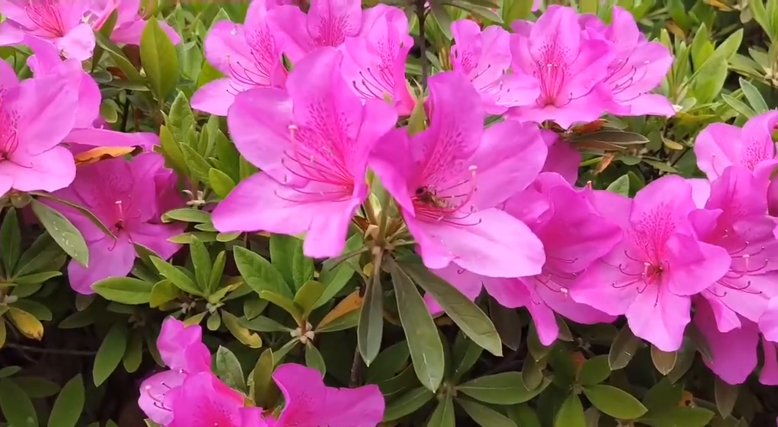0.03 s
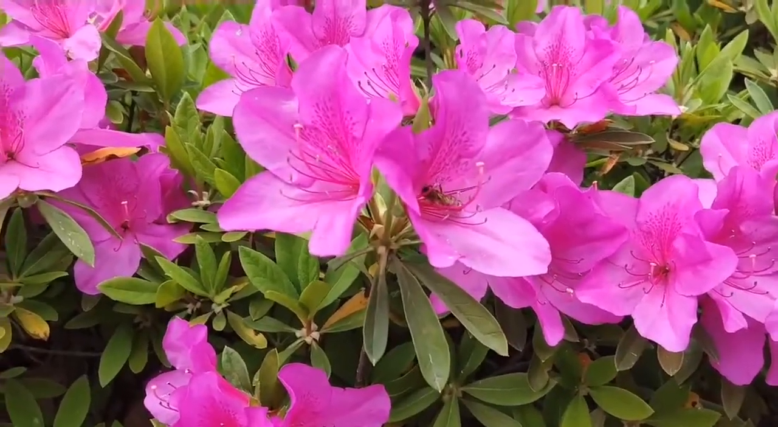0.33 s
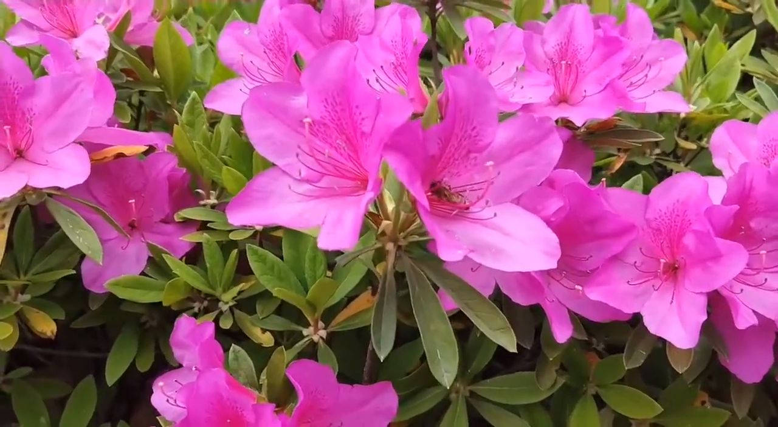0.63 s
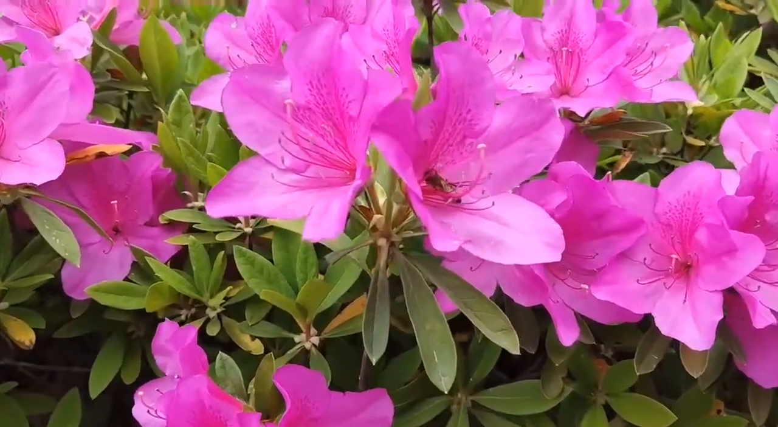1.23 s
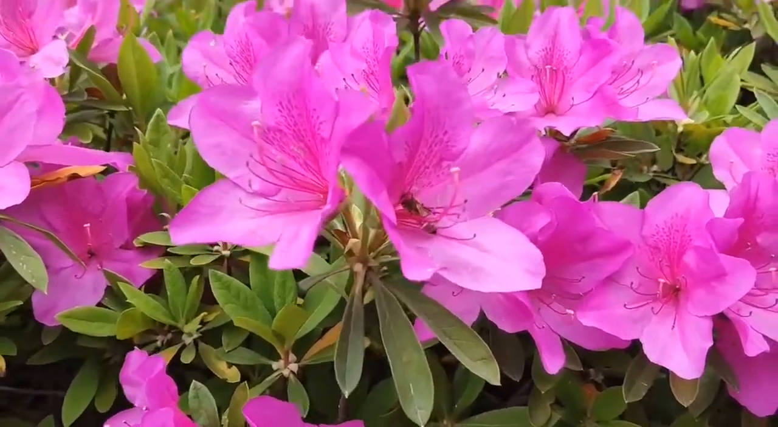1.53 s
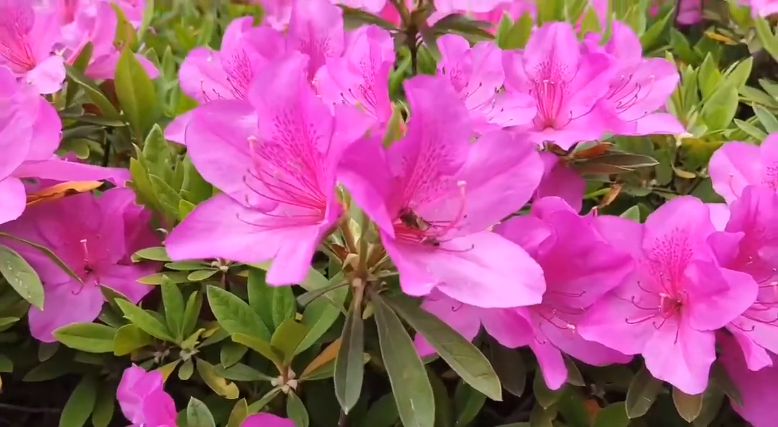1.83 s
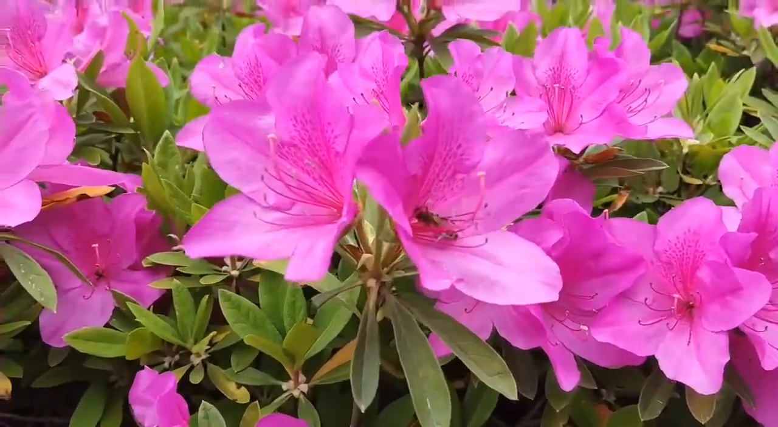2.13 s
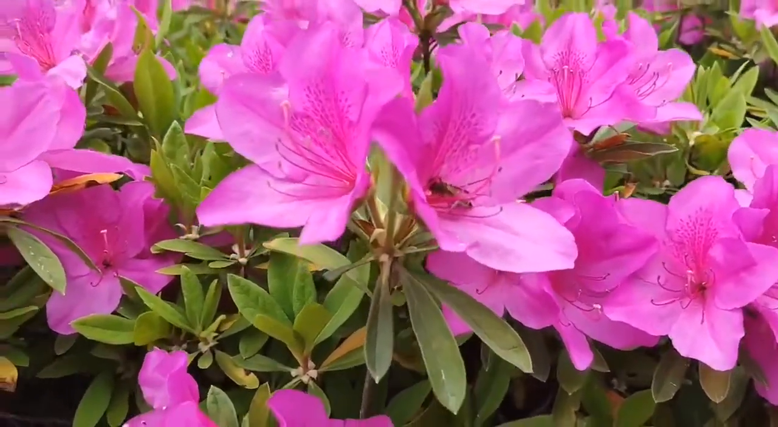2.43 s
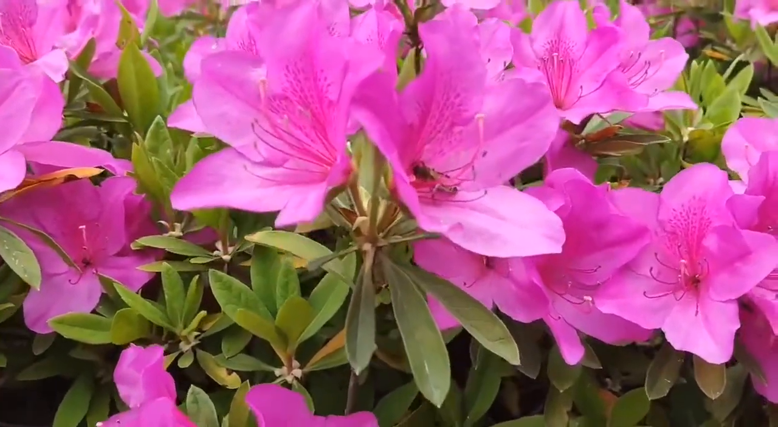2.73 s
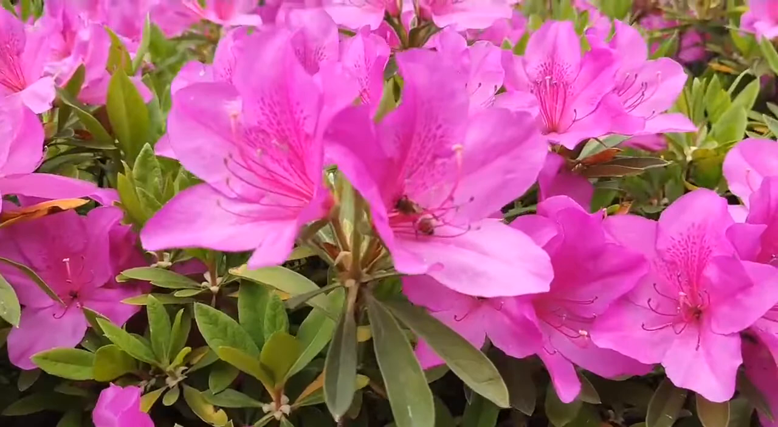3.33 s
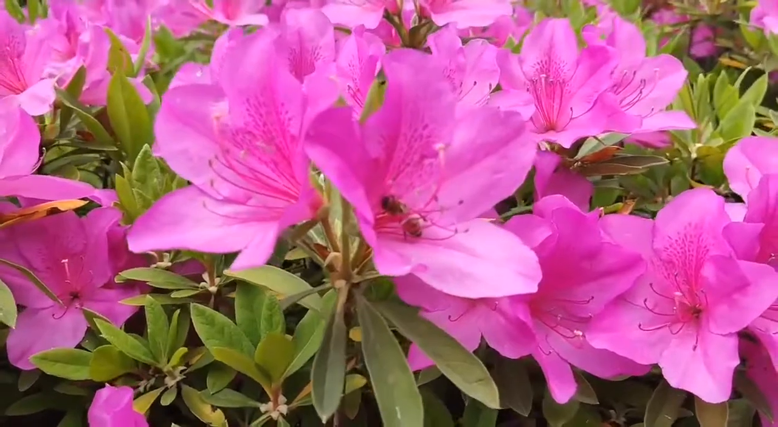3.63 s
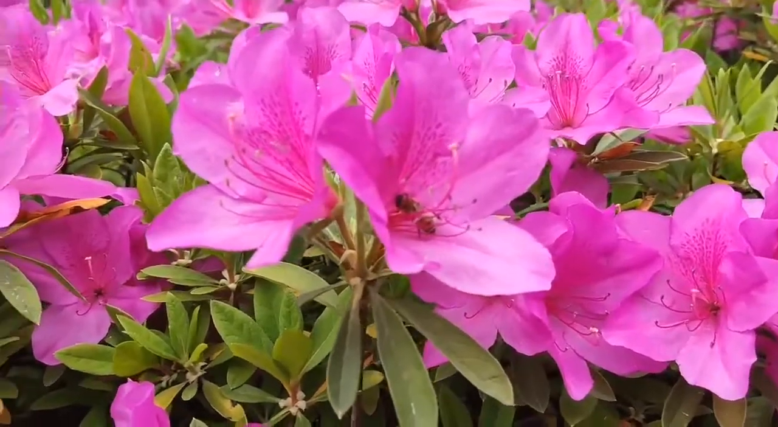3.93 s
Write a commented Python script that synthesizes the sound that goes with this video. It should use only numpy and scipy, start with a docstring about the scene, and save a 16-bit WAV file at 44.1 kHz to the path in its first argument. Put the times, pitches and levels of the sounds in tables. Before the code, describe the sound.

Birds call in a garden: soft chatter, two sharp chips, short whistles and rasps, then two more chips. A few twigs tick near the microphone, over a steady distant rumble and faint hissing leaves.

```python
"""Birds call in a garden over hissing leaves and the hum and rumble of distant machinery or traffic.
A soft, even chatter runs through the first second, and twigs tick close by as it ends.
Two sharp chips follow, with a thin twitter behind them. From 1.75 s another bird gives slurred whistles,
then short rasps, and two more chips close the scene. Faint peeps dot the first 2.5 s.
Each bird's tone is the vibration of its syrinx; walls and trees scatter the calls back."""
import sys
import numpy as np
from scipy import signal
from scipy.fft import rfft, irfft
from scipy.io import wavfile
from scipy.ndimage import map_coordinates

SR = 44100
rng = np.random.default_rng(int(sys.argv[2]) if len(sys.argv) > 2 else 0)


def generate_wav(sig):
    """Save sig (samples, or channels by samples) to the path in sys.argv[1] as 16-bit PCM at SR."""
    pcm = np.round(np.clip(np.atleast_2d(sig).T, -1, 1) * 32767).astype(np.int16)
    wavfile.write(sys.argv[1], SR, pcm)


N = 176400
T = np.arange(N) / SR

# A pan is the level of the left ear over the right.
# Likeness of the noise at the two ears. Each row: frequency in Hz, correlation.
EAR_CORRELATION = [(30, 0.91), (80, 1), (160, 0.94), (330, 0.83), (700, 0.36), (1300, 0), (3000, 0.041),
                   (16000, 0)]
# Spectrum of the rumble. Each row: frequency in Hz, relative density in dB.
RUMBLE_SPECTRUM = [(5, -8), (20, -14.5), (30, -0.5), (45, -7.5), (56, -0.5), (66, 1.5), (76, -8),
                   (90, -8.5), (110, -12.5), (135, -16.5), (160, -18.5), (220, -21), (310, -29), (420, -30),
                   (550, -31), (900, -35), (1600, -38), (3000, -43.5), (8000, -63), (16000, -54)]
# Swell of the rumble's bass. Each row: time in seconds, gain in dB.
BASS_SWELL = [(0, -2.5), (.2, -7), (.35, -0.5), (.62, -1), (.82, 5.5), (.95, -3.5), (1.42, -1), (1.69, 3),
              (1.8, -4), (2.38, -2.5), (2.58, 3.5), (2.75, 1), (3.1, 1.5), (3.38, -2.5), (4, 0)]
# Faint drones in the rumble. Each row: pitch in Hz, bandwidth in Hz, level before the swell in dB.
DRONE_BANDS = [(70.1, 13.4, -49.5), (133.1, 3.9, -59.5), (407.5, 25, -70.5)]
# Spectrum of the leaf hiss. Each row: frequency in Hz, relative density in dB.
LEAF_SPECTRUM = [(150, 2.5), (400, 9), (700, -2), (1100, 3), (1700, -2.5), (2400, 4), (3400, -0.5),
                 (4300, -1), (5400, -4), (6700, -2), (7800, -10), (10000, -13), (12500, -13.5),
                 (14500, -8.5), (16000, -3)]
# Course of the leaf hiss. Each row: time in seconds, level in dB.
LEAF_LEVEL = [(0, -61.5), (.2, -59), (.5, -55), (.75, -53.5), (1.0, -54.5), (1.3, -50.5), (1.5, -52),
              (1.75, -53), (1.84, -52), (1.89, -50), (2.0, -52.5), (2.07, -55.5), (2.4, -54.5), (2.7, -57),
              (3.3, -62), (3.6, -57.5), (3.85, -58.5), (4, -55)]
# Direction of the leaf hiss. Each row: frequency in Hz, pan in dB.
LEAF_PAN = [(300, -0.5), (800, 1), (2000, 4.5), (5000, 4), (9000, 7.5), (13000, 0.5), (16000, 9)]
# Crackles of dry leaves. Each row: centre in seconds, width in seconds, level in dB.
LEAF_CRACKLES = [(.325, 0.042, -63.5), (.475, 0.013, -67)]
# Twig ticks. Each row: start in seconds, level in dB, pitch in Hz, decay time in seconds.
TWIG_TICKS = [(.677, -41, 1390, .001), (0.8007, -33.5, 1690, 0.00037), (1.0984, -24.5, 1050, 0.00025),
              (1.1194, -27.5, 1730, 0.00036), (1.130, -42, 1500, .0006), (1.186, -27, 1980, 0.00062),
              (1.3467, -37.5, 2520, 0.00088), (1.8, -37, 7480, 0.000091), (2.904, -44, 7000, .00015),
              (3.18, -43, 4000, 0.0004), (3.423, -44, 7000, 0.00012), (3.958, -42, 10000, 0.000096)]
# Course of the far twitter. Each row: time in seconds, level in dB.
TWITTER_LEVEL = [(1.1, -82), (1.25, -63), (1.36, -64), (1.52, -62.5), (1.66, -70.5), (1.9, -63), (2.1, -80)]
# Buzzy peeps. Each row: start in seconds, length in seconds, level in dB, pitch in Hz, pan in dB.
PEEP_NOTES = [(.022, 0.086, -63.5, 4030, 1), (.033, 0.035, -55.5, 3185, -6), (.285, .08, -61.5, 2330, 2),
              (.725, 0.055, -60, 3660, 5), (1.292, 0.034, -48.5, 3600, 4), (1.402, 0.017, -45, 3480, 5),
              (1.612, .025, -55.5, 3300, -5), (1.785, 0.026, -55.5, 3400, 3), (1.87, 0.017, -55, 2190, 7),
              (2.448, 0.025, -59.5, 4620, -3)]
# Chatter. Each row: centre in seconds, relative scratch level in dB, scratch pitch in Hz,
# relative chirp level in dB.
CHATTER_PULSES = [(0.325, -49, 2600, -65), (0.444, -46.5, 3000, -52), (0.568, -50.5, 3250, -41),
                  (.692, -50, 3150, -56), (.812, -47, 3150, -44), (.932, -47, 3200, -60),
                  (1.054, -48, 3200, -48), (1.177, -44.5, 3350, -46)]
# Airy hiss of the chatter. Each row: frequency in Hz, relative density in dB.
AIR_SPECTRUM = [(1500, -24), (2300, 5.5), (3500, 1.5), (4500, 0.5), (5300, -3), (6500, -2), (7600, -21),
                (15000, -32)]
# Rasps. Each row: start in seconds, length in seconds, level in dB, pitch in Hz, pan in dB.
RASP_NOTES = [(2.452, 0.028, -46.5, 2486, 2), (2.576, 0.044, -58.5, 3820, 5.5),
              (2.632, 0.032, -54.5, 3350, 5), (2.75, 0.054, -49.5, 2410, 2), (2.824, 0.013, -42, 2470, 6),
              (2.872, 0.045, -50, 2930, 2), (2.888, 0.035, -49, 2340, 2), (3.068, 0.018, -48, 2410, 6)]
# Whistles. Each row: start in seconds, length in seconds, level in dB,
# four pitches in Hz at even steps through the note, pan in dB.
WHISTLE_NOTES = [(1.753, 0.022, -48.5, 3050, 3150, 3220, 3130, -3),
                 (2.095, 0.024, -50.5, 1980, 2006, 1800, 1570, 2),
                 (2.302, 0.064, -44, 2435, 2345, 2315, 2180, 5.5),
                 (2.448, 0.043, -50.5, 2376, 2252, 1890, 1620, 3),
                 (2.797, 0.043, -43, 2660, 2920, 2867, 2640, 3.5),
                 (2.914, 0.049, -42.5, 2782, 2890, 2886, 2850, 2.5),
                 (3.019, 0.044, -42.5, 3660, 3520, 3487, 3470, -3),
                 (3.0, 0.112, -50.5, 2894, 2897, 2880, 3166, 2),
                 (3.078, 0.0286, -62, 5160, 5700, 5980, 6050, 11.5),
                 (3.509, 0.031, -49, 1550, 1730, 1860, 2320, 0),
                 (3.533, 0.066, -47, 2170, 2630, 2720, 2745, 1.5),
                 (3.754, 0.072, -42.5, 2360, 2310, 2250, 2230, 4),
                 (3.903, 0.094, -54.5, 2070, 1703, 1620, 1630, 1)]
# Course of every chip. Each row: time from the accent in seconds, pitch ratio, gain in dB.
CHIP_CONTOUR = [(-.022, 1.1, -26), (-.017, 0.97, -20.5), (-.012, 1.12, -34), (-.007, 1.33, -23),
                (-.003, 1.3, -24), (0, .87, -25), (.003, .96, -11.5), (.007, 1.04, -6), (.01, 0.96, -11.5),
                (0.015, 1.1, -15), (.02, 0.9, -22)]
# Chips, before the contour acts. Each row: accent time in seconds, level in dB, pitch in Hz, pan in dB.
CHIP_NOTES = [(1.24, -31, 3326, 8), (1.426, -28.5, 3245, 9), (3.792, -29.5, 3330, 5.5),
              (3.977, -28.5, 3350, 3.5)]

TWIG_PAN_DB = 5  # shared by ticks and crackles


def amp(db):
    """Amplitude ratio of a level in decibels."""
    return 10 ** (np.asarray(db) / 20)


def unit(x):
    """Normalisation to an rms of 1."""
    return x / np.sqrt(np.mean(x ** 2) + 1e-20)


def read(points, hz):
    """Interpolation on a logarithmic frequency axis."""
    f, value = np.transpose(points)
    return np.interp(np.log(hz + 1), np.log(f + 1), value)


def course(points):
    """Linear interpolation of a table over time."""
    return np.interp(T, *np.transpose(points))


def bell(centre_s, width_s):
    """Gaussian envelope with a peak of 1."""
    return np.exp(-.5 * ((T - centre_s) / width_s) ** 2)


def sides(db):
    """Interaural level difference, as left and right gains."""
    return amp(np.array([[db], [-db]]) / 2)


def bearing(x, right_lag_s):
    """Interaural time difference: a sound from one side reaches one ear first."""
    hz = np.fft.rfftfreq(N, 1 / SR)
    return np.array([x[0], irfft(rfft(x[1]) * np.exp(-2j * np.pi * hz * right_lag_s), N)])


def add(mix, start_s, sound):
    """Superposition of a stereo sound on the mix."""
    part = mix[:, max(round(start_s * SR), 0):][:, :sound.shape[1]]
    part += sound[:, :part.shape[1]]


def drift(rate_hz):
    """Low-passed noise: a smooth random fluctuation of rms 1."""
    hz = np.fft.rfftfreq(N, 1 / SR)
    return unit(irfft(rfft(rng.standard_normal(N)) * np.exp(-(hz / rate_hz) ** 2), N))


def noise(spectrum):
    """Diffuse coloured noise, correlated between the ears only at low frequencies."""
    hz = np.fft.rfftfreq(N, 1 / SR)
    left, independent = rfft(rng.standard_normal((2, N)))
    correlation = np.clip(read(EAR_CORRELATION, hz), -1, 1)
    right = correlation * left + np.sqrt(1 - correlation ** 2) * independent
    return unit(irfft(np.array([left, right]) * amp(read(spectrum, hz)), N))


def band(centre_hz, width_hz):
    """A steep resonance driven by stereo noise."""
    detuning = (np.fft.rfftfreq(N, 1 / SR) - centre_hz) / width_hz * 2
    return unit(irfft(rfft(rng.standard_normal((2, N))) / (1 + detuning ** 2), N))


def hum(pitch_hz=35.45, level_db=-42):
    """Distant machinery or traffic: a deep sinusoid under slow frequency and amplitude modulation."""
    hz = pitch_hz + .44 * drift(1.75)
    tone = np.sqrt(2) * np.sin(2 * np.pi * np.cumsum(hz) / SR)
    return amp(level_db) * tone * (1 + .26 * drift(3.4))


def rumble(swell_below_hz=112):
    """Distant machinery or traffic: broadband noise and narrow resonances, swelling in the bass."""
    steady = amp(-39.5) * noise(RUMBLE_SPECTRUM)
    steady += sum(amp(db) * band(hz, width)[0] for hz, width, db in DRONE_BANDS)
    bass = signal.sosfiltfilt(signal.butter(2, swell_below_hz, fs=SR, output="sos"), steady)
    return steady + (amp(course(BASS_SWELL)) - 1) * bass


def leaf_hiss(flicker_db=1):
    """Leaves hiss as amplitude-modulated noise, its treble stronger on the left."""
    pan = read(LEAF_PAN, np.fft.rfftfreq(N, 1 / SR))
    hiss = irfft(rfft(noise(LEAF_SPECTRUM)) * amp(np.array([pan, -pan]) / 2), N)
    return hiss * amp(course(LEAF_LEVEL) + flicker_db * drift(31))


def leaf_brush():
    """One soft brush of leaves: a band of noise under a fluttering Gaussian envelope."""
    envelope = amp(-52 + 2 * drift(250)) * bell(centre_s=1.1, width_s=.029)
    return envelope * band(centre_hz=930, width_hz=1700)


def leaf_crackle(clicks_per_s=1000, ring_hz=8550, decay_s=.00008):
    """Dry leaves crackle as clusters of random impulses, each exciting a damped resonance."""
    t = np.arange(0, .002, 1 / SR)
    clicks = rng.standard_normal((2, N)) * (rng.random(N) < clicks_per_s / SR)
    ring = np.exp(-t / decay_s) * np.sin(2 * np.pi * ring_hz * t)
    grains = signal.oaconvolve(clicks, ring[None], axes=1)[:, :N]
    envelope = sum(amp(db) * bell(centre, width) for centre, width, db in LEAF_CRACKLES)
    return unit(grains) * sides(TWIG_PAN_DB) * envelope


def twigs():
    """Each tick is a damped oscillation that decays within a cycle or two."""
    out, t = np.zeros((2, N)), np.arange(0, .02, 1 / SR)
    for start, db, hz, decay in TWIG_TICKS:
        ring = np.exp(-t / decay) * np.sin(2 * np.pi * hz * t)
        add(out, start, sides(TWIG_PAN_DB) * amp(db) * ring)
    return out


def echoes(x, t60, count=400, first_s=.008):
    """Reverberation: scattered reflections, different at each ear, fall by 60 dB in t60 seconds."""
    taps = np.zeros((2, 2 * SR))
    for ear in taps:
        delay = (np.arange(count) + rng.random(count)) / count * t60
        strength = rng.choice([-1., 1.], count) * amp(-60 * delay / t60)
        np.add.at(ear, ((first_s + delay) * SR).astype(int), strength)
    taps /= np.linalg.norm(taps, axis=1, keepdims=True)
    return signal.fftconvolve(x, taps, axes=1)[:, :N]


def sway(x, delay_s=.00003, rate_hz=60):
    """Doppler effect: moving foliage varies the delay of the echoes and smears their pitch."""
    return np.array([map_coordinates(ear, [(T + delay_s * drift(rate_hz)) * SR], order=3) for ear in x])


def twitter(flicker_db=2.2):
    """Scattering by the trees blurs a thin, far twitter into a flickering band of noise."""
    return band(centre_hz=5290, width_hz=580) * amp(course(TWITTER_LEVEL) + flicker_db * drift(25))


def syrinx(hz, octave_db=-23.5, octave_fade_hz=3600):
    """The syrinx vibrates almost sinusoidally; its weak second harmonic fades in high notes."""
    phase = 2 * np.pi * np.cumsum(hz) / SR
    octave = amp(octave_db) / (1 + (hz / octave_fade_hz) ** 10)
    return np.sqrt(2) * (np.sin(phase) + octave * np.sin(2 * phase))


def gate(t, length, rise_s=.014, release_s=.015):
    """Envelope of a note, with a quarter-sine attack and release."""
    attack = np.sin(np.pi / 2 * np.clip(t / rise_s, 0, 1))
    release = np.sin(np.pi / 2 * np.clip((length - t) / release_s, 0, 1))
    return attack * release


def hoarse(notes, swing, rate_hz, scatter):
    """Fast, uneven frequency modulation spreads a tone into sidebands, heard as a rasp or buzz."""
    out = np.zeros((2, N))
    shake_phase = 2 * np.pi * np.cumsum(rate_hz * (1 + .23 * drift(103))) / SR
    shake = 1 + swing * np.sin(shake_phase) + scatter * drift(1000)
    for start, length, db, hz, pan in notes:
        t = np.arange(0, length, 1 / SR)
        tone = syrinx(hz * np.interp(start + t, T, shake))
        add(out, start, sides(pan) * amp(db) * gate(t, length) * tone)
    return out


def chatter(rise_s=.02, fall_s=.011, chirp_decay_s=.0047, sag_per_s=9):
    """A pulse train, eight a second: each an arched chirp inside a noisy resonance and airy hiss."""
    out, t = np.zeros((2, N)), np.arange(-.025, .025, 1 / SR)
    air = amp(-49.5) * noise(AIR_SPECTRUM)
    shake = 1 + .03 * drift(450)
    for centre, scratch_db, hz, chirp_db in CHATTER_PULSES:
        scratch = amp(scratch_db) * band(hz, width_hz=900)
        out += bell(centre, np.where(T < centre, rise_s, fall_s)) * (scratch + air)
        arch = 1.1 * (1 - sag_per_s * abs(t))  # peaks a tenth above the resonance
        chirp = np.exp(-abs(t) / chirp_decay_s) * syrinx(hz * arch * np.interp(centre + t, T, shake))
        add(out, centre + t[0], sides(0) * amp(chirp_db) * chirp)
    return out * sides(.5) * amp(-5.5 + 1.7 * drift(160))


def whistles(swell_db=4):
    """Frequency glides: each clear note swells as it slurs along a cubic through four pitches."""
    out, waver = np.zeros((2, N)), 1 + .008 * drift(320)
    for start, length, db, *pitches, pan in WHISTLE_NOTES:
        t = np.arange(0, length, 1 / SR)
        glide = np.polyfit(np.linspace(0, 1, 4), pitches, 3)
        hz = np.polyval(glide, t / length) * np.interp(start + t, T, waver)
        envelope = amp(db + swell_db * (t / length - .5)) * gate(t, length)
        add(out, start, sides(pan) * envelope * syrinx(hz))
    return out


def chips(flick_scatter=.05, note_scatter=.03):
    """Rapid frequency sweeps: each chip flicks faintly upward, then snaps down to a short loud note."""
    out, shake = np.zeros((2, N)), drift(840)
    times, ratios, gains_db = np.transpose(CHIP_CONTOUR)
    t = np.arange(times[0], times[-1], 1 / SR)
    sweep, contour_db = np.interp(t, times, ratios), np.interp(t, times, gains_db)
    scatter = np.where(t < 0, flick_scatter, note_scatter)
    for accent, db, hz, pan in CHIP_NOTES:
        tone = syrinx(hz * sweep * (1 + scatter * np.interp(accent + t, T, shake)))
        add(out, accent + times[0], sides(pan) * amp(db + contour_db) * tone)
    return out


def scene():
    """Superposition of direct sound, reflections and background; the farther song echoes the most."""
    song = whistles() + hoarse(RASP_NOTES, swing=.1, rate_hz=170, scatter=.07)
    calls = chips() + hoarse(PEEP_NOTES, swing=.03, rate_hz=130, scatter=.04)
    pulses = chatter()
    foliage = twigs() + leaf_brush() + leaf_crackle()
    direct = bearing(song, right_lag_s=-.000078) + bearing(calls + pulses, right_lag_s=.00005) + foliage
    near = echoes(amp(-8) * song, t60=.17)
    near += echoes(amp(-4.5) * calls + amp(-5) * pulses + amp(-12) * foliage, t60=.15)
    far = echoes(amp(-4) * song + amp(-13.5) * (calls + pulses), t60=.85)
    wall_echo = echoes(amp(-12) * song, t60=.12)
    add(far, start_s=.115, sound=wall_echo)
    return direct + near + sway(far) + twitter() + hum() + rumble() + leaf_hiss()


def record(dry):
    """Band limiting: a steep low-pass filter removes the highest treble."""
    cutoff_hz = 15780
    lowpass = signal.firwin(511, cutoff_hz, window=("kaiser", 9), fs=SR)
    return signal.oaconvolve(dry, lowpass[None], "same")


dry = scene()
out = record(dry)
generate_wav(out)
```